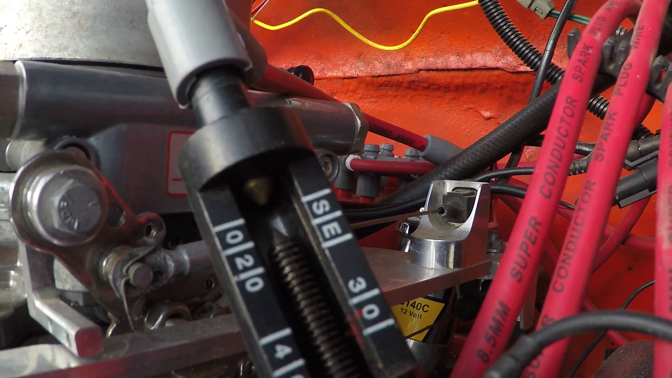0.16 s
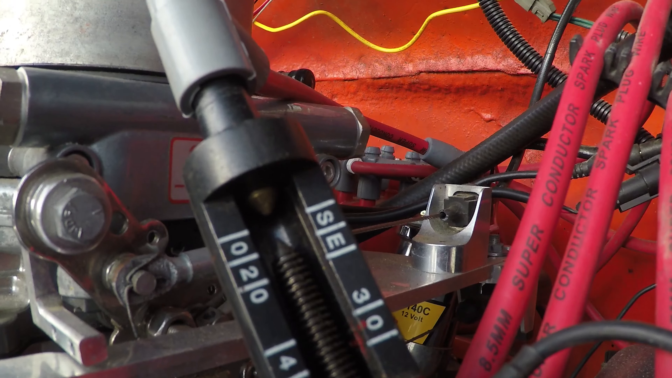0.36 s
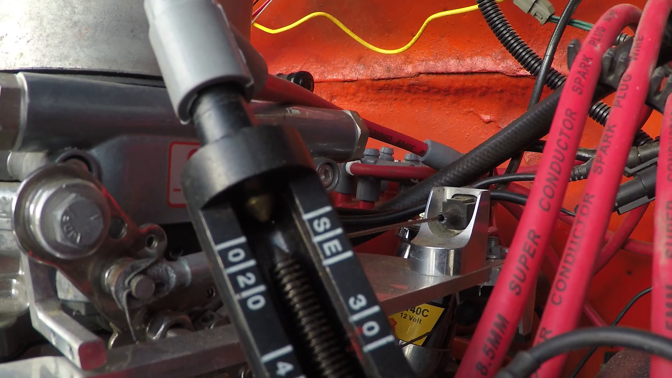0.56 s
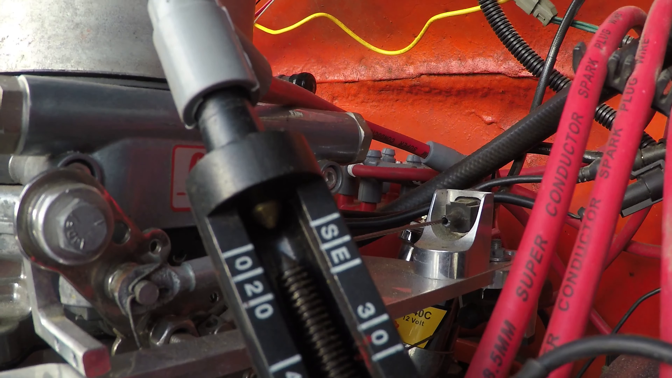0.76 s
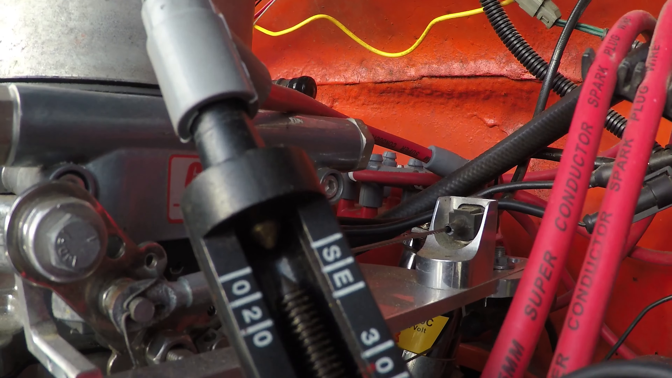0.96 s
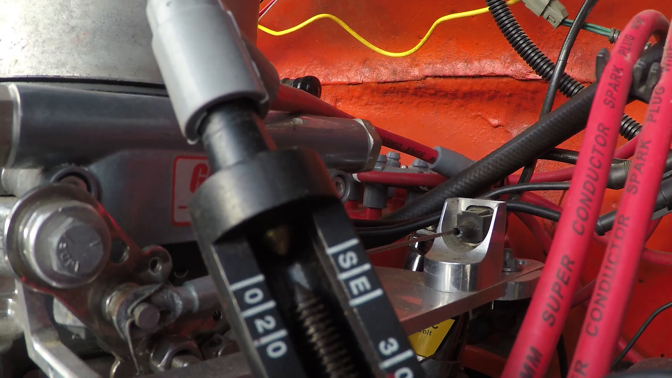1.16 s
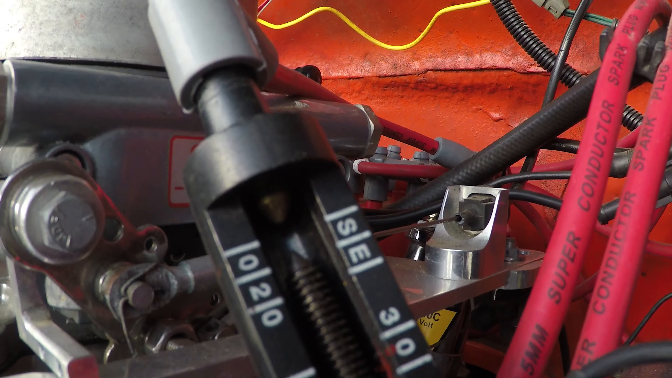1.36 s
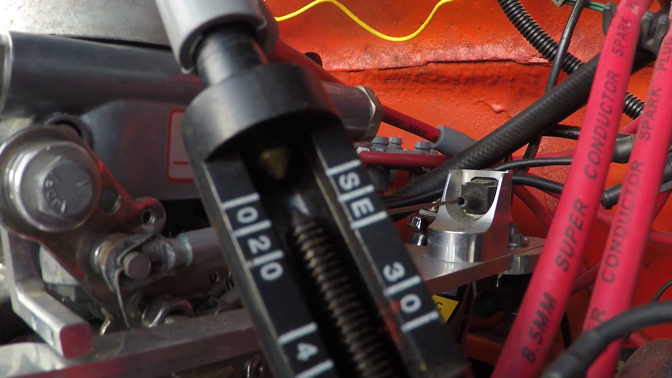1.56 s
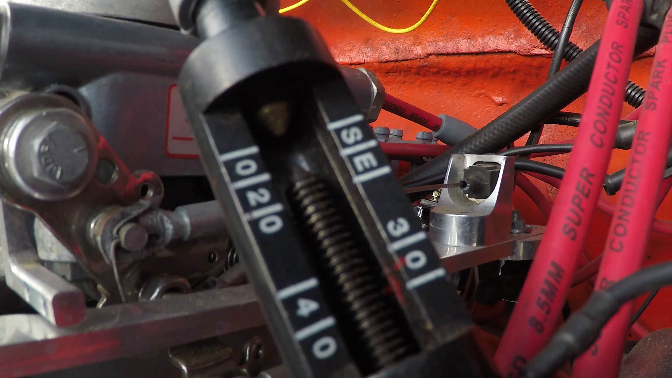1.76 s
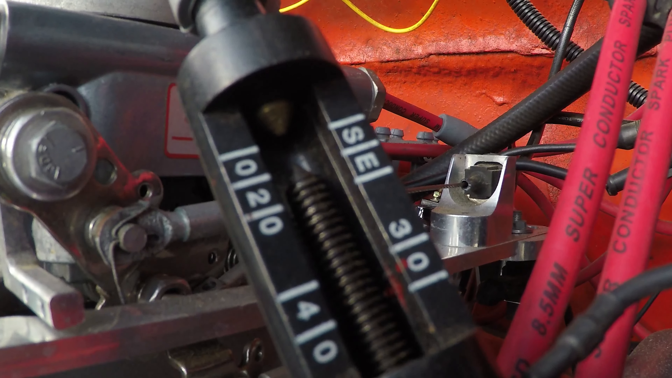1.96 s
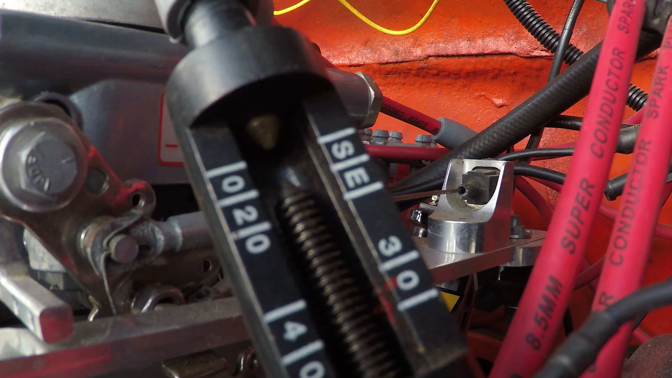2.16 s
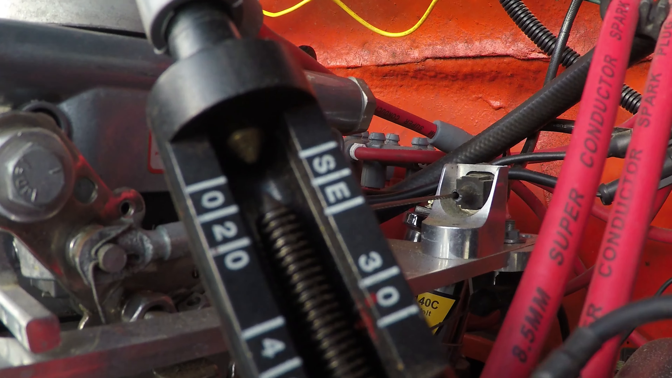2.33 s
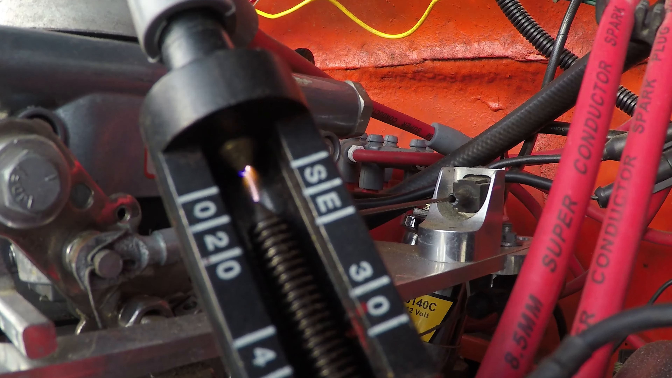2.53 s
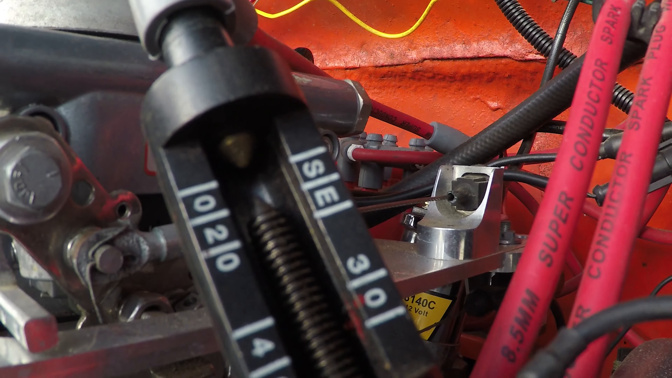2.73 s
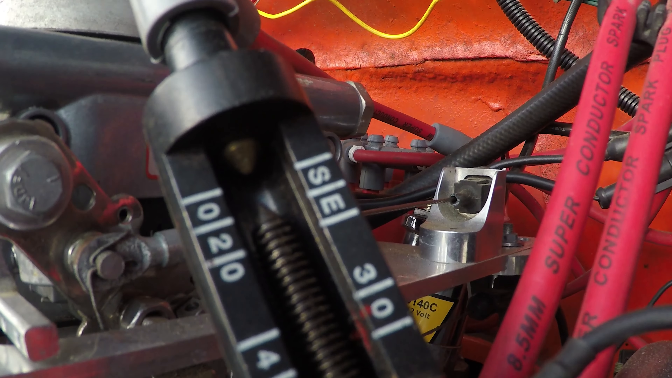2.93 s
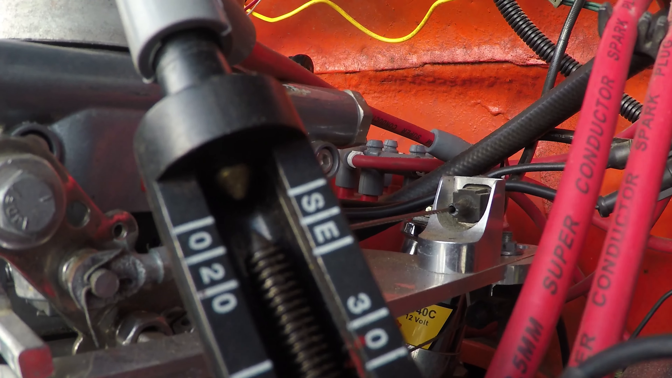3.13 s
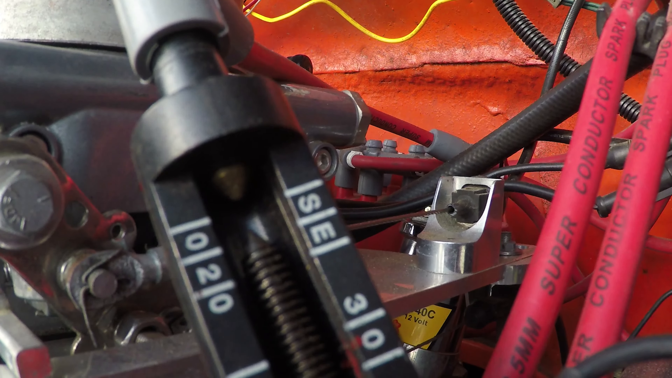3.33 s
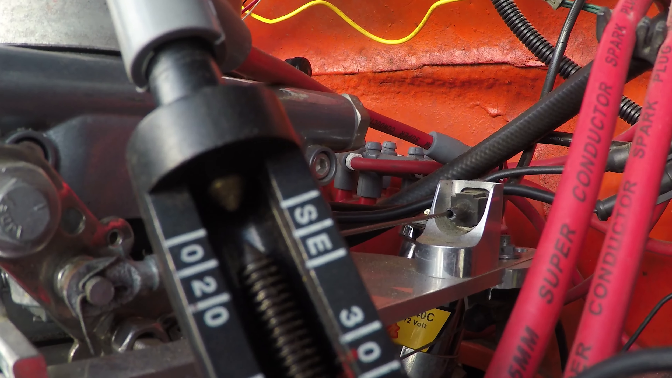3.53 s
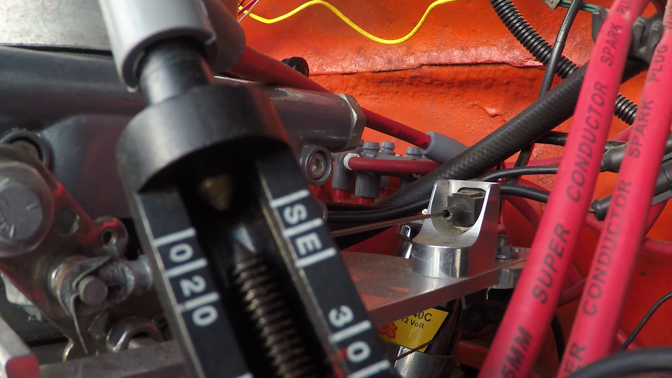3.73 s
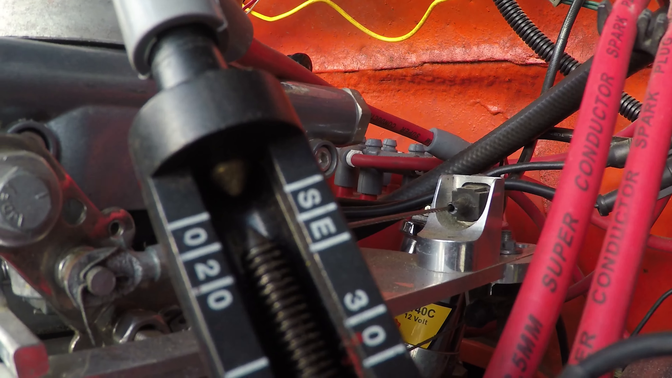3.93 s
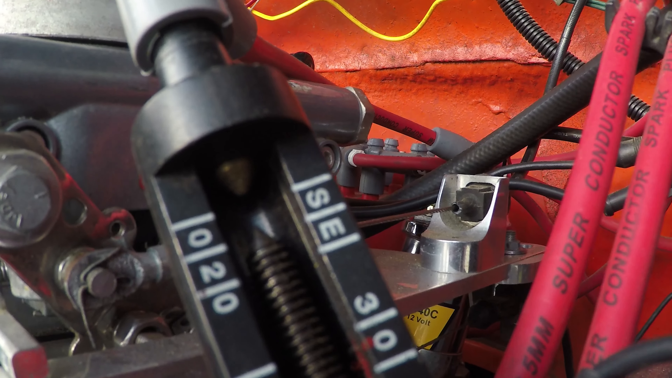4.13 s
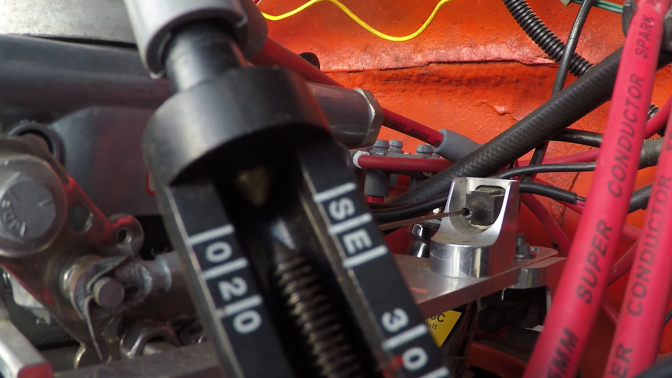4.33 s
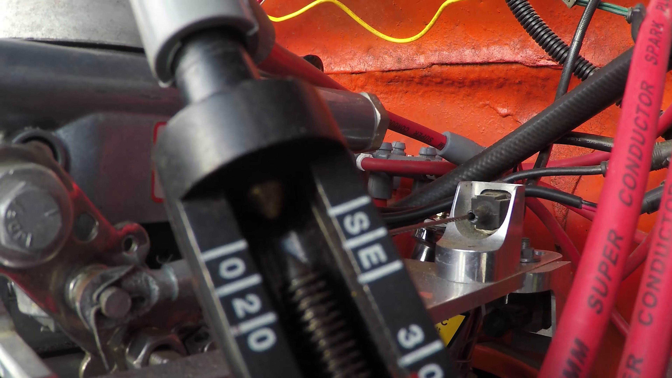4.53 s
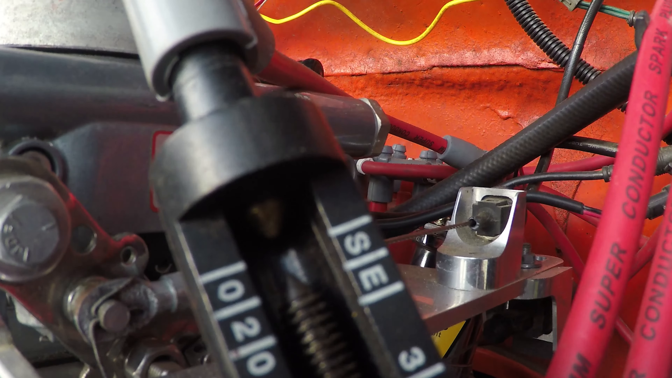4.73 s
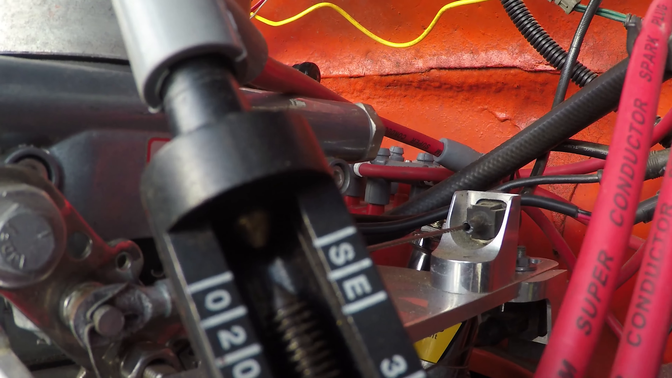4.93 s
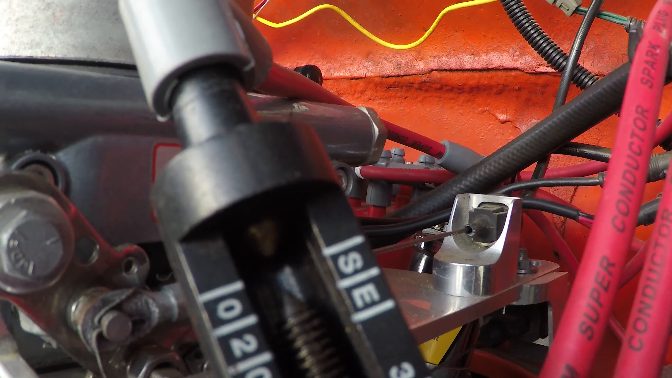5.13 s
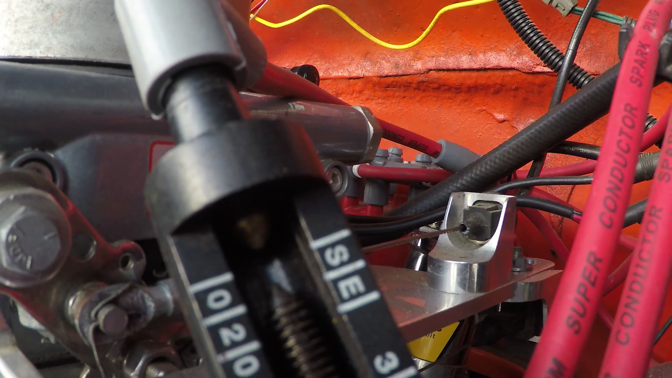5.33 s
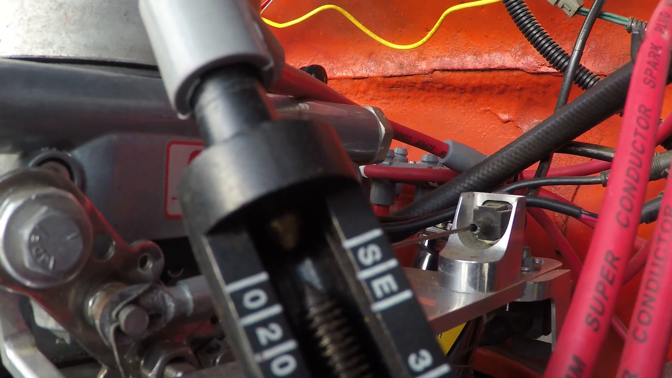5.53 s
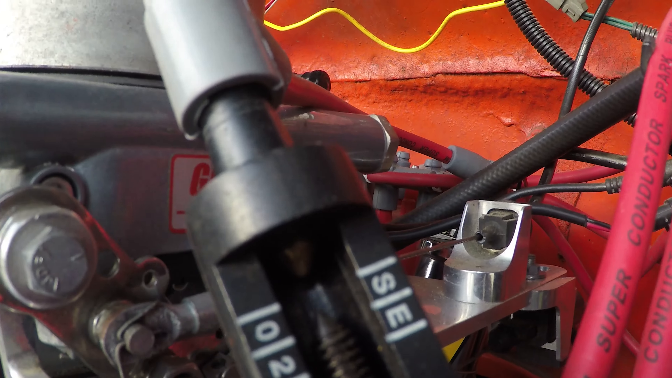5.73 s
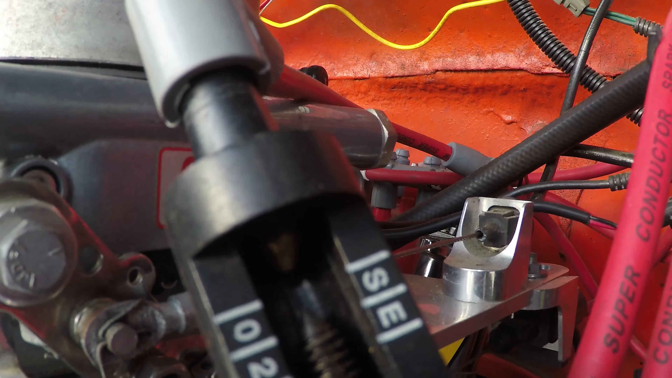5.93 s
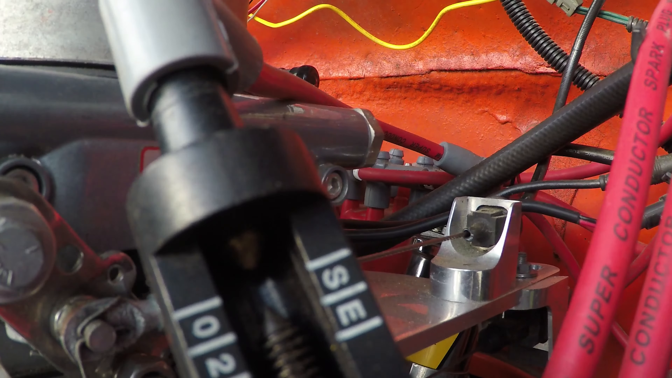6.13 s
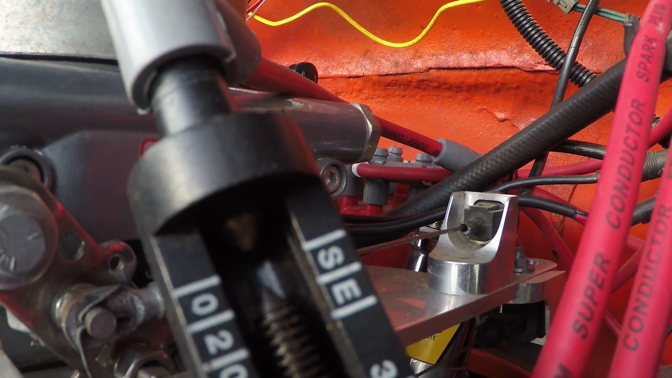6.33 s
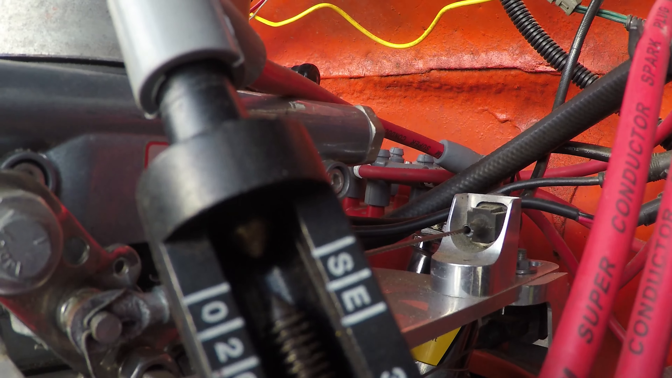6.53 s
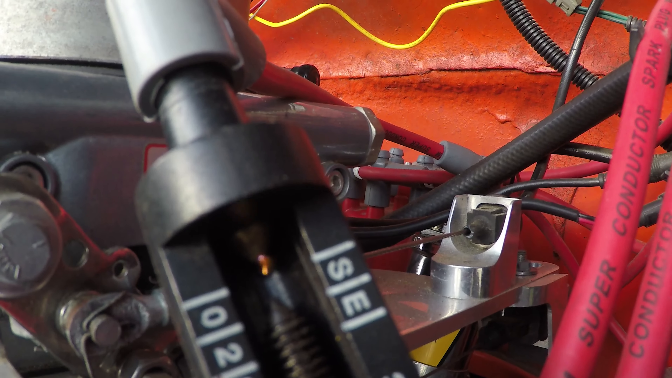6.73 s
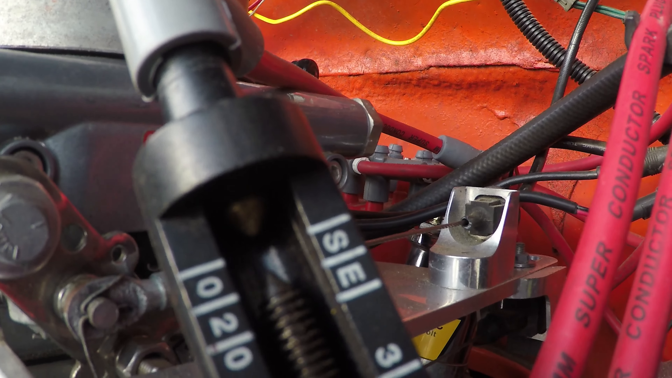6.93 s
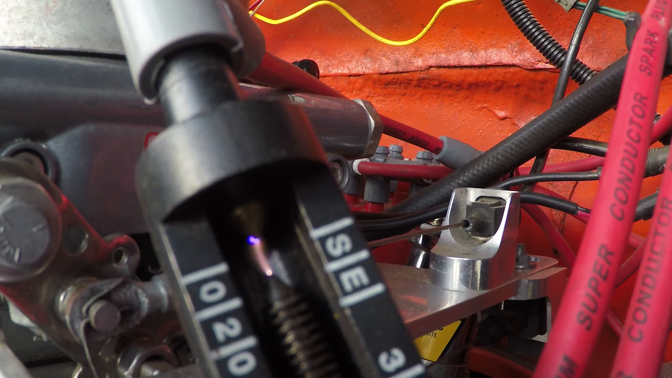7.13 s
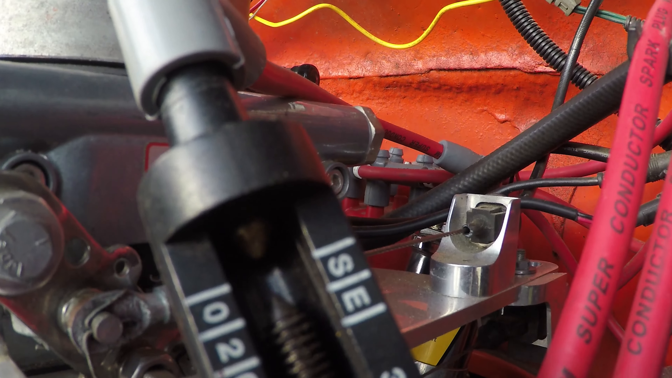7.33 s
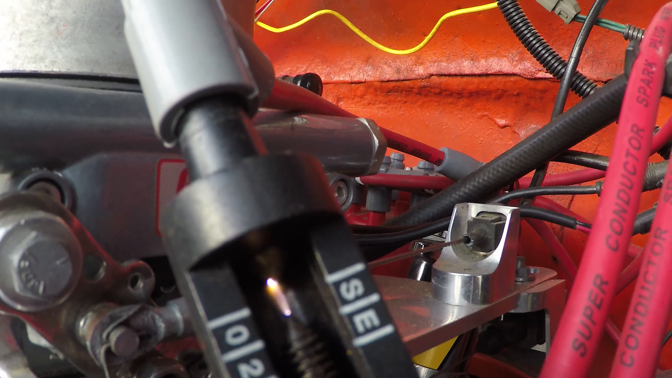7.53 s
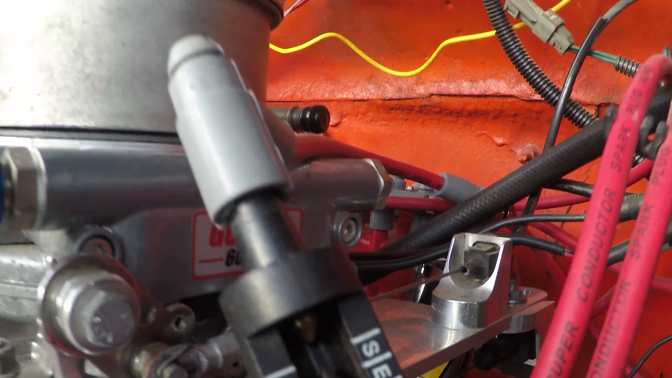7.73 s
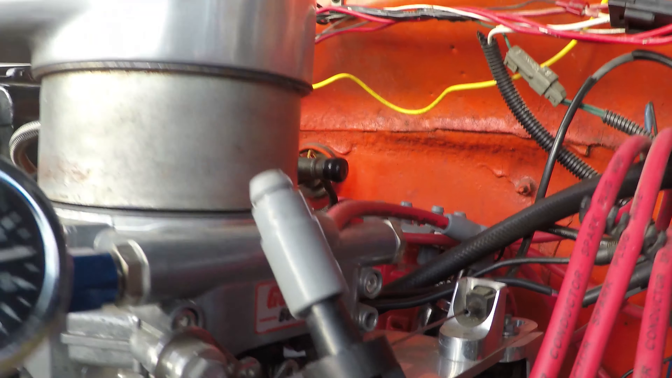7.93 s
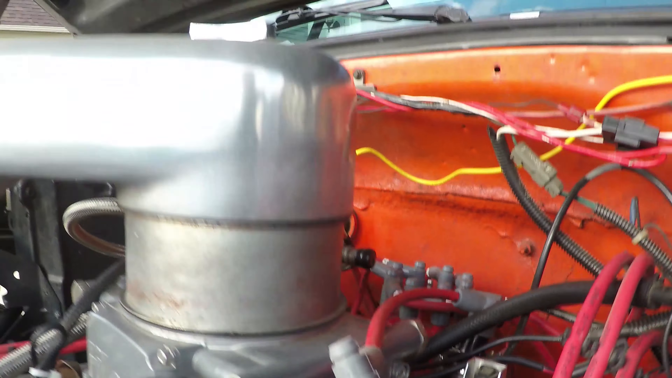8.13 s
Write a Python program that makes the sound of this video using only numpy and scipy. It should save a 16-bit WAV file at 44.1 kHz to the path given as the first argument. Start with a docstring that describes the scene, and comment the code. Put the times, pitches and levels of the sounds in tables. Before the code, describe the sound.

In an open engine bay, bright electrical zaps crack irregularly, ringing off metal, above a throbbing high whine, before a rapid volley of snaps.

```python
"""A pump whines and throbs under hiss and a low outdoor murmur, with faint ticks and one soft crackle; then sparks.
A multi-strike ignition box fires across a spark tester held close to a camera, in a parked vehicle's engine bay.
Each firing is a quick train of snaps, all one pulse shape, ringing the bay; sparse at first, then a dense run.
The pump is a jittery tone with fuzz; hiss, air, murmur and rumble are shaped noise.
The camera's gain control ducks under the sparks and creeps back within a second."""
import sys
import numpy as np
from scipy import signal
from scipy.fft import rfft, irfft, next_fast_len
from scipy.io import wavfile
from scipy.ndimage import map_coordinates

SR = 44100
rng = np.random.default_rng(int(sys.argv[2]) if len(sys.argv) > 2 else 0)


def persist_wave(psi):
    """Save psi, clipped to +-1, as 16-bit WAV."""
    counts = np.round(np.clip(psi, -1, 1) * 32767).astype(np.int16)
    wavfile.write(sys.argv[1], SR, np.atleast_2d(counts).T)


N = 365148


def amp(db):
    """Decibels to linear gain."""
    return 10 ** (np.asarray(db) / 20)


def unit(x):
    """Scale to rms 1."""
    return x / np.sqrt(np.mean(x ** 2) + 1e-20)


def along(points, hz):
    """Read (freq_hz, value) points on a log frequency axis."""
    freq_hz, value = np.transpose(points)
    return np.interp(np.log(hz + 1), np.log(freq_hz + 1), value)


def curves(rows):
    """One value per sample for each column after the time."""
    time_s, *columns = np.transpose(rows)
    return [np.interp(np.arange(N) / SR, time_s, column) for column in columns]


def wobble(rate):
    """A smooth random curve with this many knots a second."""
    knots = rng.standard_normal(int(N * rate / SR) + 4)
    return map_coordinates(knots, [np.arange(N) * rate / SR])


def filtered(x, response):
    """Shape the spectrum of x by a response of frequency."""
    n = x.shape[-1]
    padded = next_fast_len(n + SR // 4)
    spectrum = rfft(x, padded) * response(np.fft.rfftfreq(padded, 1 / SR))
    return irfft(spectrum, padded)[..., :n]


def noise(spectrum):
    """Coloured noise of rms 1."""
    return unit(filtered(rng.standard_normal(N), lambda hz: amp(along(spectrum, hz))))


def pulse(spectrum, size=4096):
    """Minimum-phase pulse: the shortest causal one with this spectrum, peak 1."""
    cepstrum = irfft(np.log(amp(along(spectrum, np.fft.rfftfreq(size, 1 / SR)))))
    # fold the cepstrum onto positive time
    cepstrum[1:size // 2] *= 2
    cepstrum[size // 2 + 1:] = 0
    wave = irfft(np.exp(rfft(cepstrum)))
    return wave / np.abs(wave).max()


def add(track, s, sound):
    """Mix a sound into the track at s seconds."""
    part = track[max(round(s * SR), 0):][:len(sound)]
    part += sound[:len(part)]


def lagged(x, seconds):
    """Follow x sluggishly, with this time constant."""
    keep = np.exp(-1 / (seconds * SR))
    return signal.lfilter([1 - keep], [1, -keep], x)


# moments when the ignition box is triggered: [start_s]
FIRING_TIMES = [0.4548, 0.4601, 0.5865, 0.865, 0.9185, 2.5621, 2.568, 2.5762, 2.5842, 2.7347, 3.1026,
                3.2154, 3.7047, 4.1432, 4.1482, 5.3571, 5.378, 6.76, 6.7855, 6.8481, 6.8951, 6.9289, 7.0105,
                7.0371, 7.0715, 7.084, 7.09, 7.1485, 7.1677, 7.204, 7.222, 7.2684, 7.3084, 7.322, 7.407,
                7.446, 7.4616, 7.4772, 7.512, 7.5376, 7.55, 7.5696, 7.617, 7.653, 7.671]
# relative colour of one strike: [freq_hz, level_db (per Hz)]
SNAP_COLOUR = [(60, -72), (150, -25), (400, -43), (750, -21), (1050, -19), (1400, -13.5), (2000, -17.5),
               (3200, -9), (4200, -3), (6000, 3), (7000, -1), (8200, -14), (10500, -18.5), (15000, -23)]


def sparks(spark_db=2.5, recharge_s=.0057, restrike_db=-3.5, scatter_db=1.75):
    """The first strike breaks cold air with charge from the pause; hot-channel restrikes are typically weaker."""
    track, snap = np.zeros(N), pulse(SNAP_COLOUR)
    for s in FIRING_TIMES:
        pause = since_firing(s)
        first = amp(spark_db) * (1 - np.exp(-pause / recharge_s))
        restrikes = amp(restrike_db + scatter_db * rng.standard_normal(size=32))
        strike = in_bay(snap, ring_db=-3, echo_db=-7.5)
        for k, moment in enumerate(train(s)):
            strength = first * (restrikes[k] if k else 1)
            add(track, moment, strength * strike)
        # a thin swell is heard leading into each firing
        swell = lead_in(pause)
        add(track, s - len(swell) / SR, first * swell)
    return track


def train(s, first_gap=.00115, last_gap=.00162, settle=2.3, pause_per_strike_s=.0055,
          rest_strikes=5, run_strikes=11, run_firings=4, run_window_s=.25):
    """Strike times of a firing: more after a longer pause, slowing down, cut off by the next firing."""
    firings = np.array(FIRING_TIMES)
    recent = np.sum((firings < s) & (firings > s - run_window_s))
    most = run_strikes if recent >= run_firings else rest_strikes
    k = np.arange(min(np.ceil(since_firing(s) / pause_per_strike_s), most))
    gaps = last_gap + (first_gap - last_gap) * np.exp(-k / settle)
    ends = s + np.cumsum(gaps)
    next_firing = firings[firings > s].min(initial=np.inf)
    return (ends - gaps)[(k == 0) | (ends < next_firing)]


def since_firing(t, opening_pause_s=.56):
    """Seconds since the last firing before each time t; some pause has already gone by at the start."""
    starts = np.sort(np.append(FIRING_TIMES, -opening_pause_s))
    return t - starts[np.searchsorted(starts, t) - 1]


# engine bay resonances: [freq_hz, width_hz (before a floor), level_db (relative, before random scatter)]
BAY_MODES = [(1298, 39, -16), (2830, 160, -50), (3245, 180, -11.5), (4105, 98, 6), (4360, 99, -32),
             (4897, 71, 0.5), (4930, 31, -2), (5430, 87, -21), (5650, 72, -6), (6290, 120, 6),
             (6340, 29, 8.5), (6810, 110, 11.5), (7340, 33, -20), (6750, 130, -29), (7440, 77, 9.5),
             (8100, 93, 1.5), (8530, 28, -5.5), (9420, 56, -4.5), (9770, 27, -9)]
# echo decay under the hood: [freq_hz, t60_s]
HOOD_DECAY = [(500, 0.075), (1500, 0.056), (3500, 0.059), (6500, 0.088), (14000, 0.081)]
# first reflections off the tester frame and the metal next to it: [delay_s, level_db]
NEAR_REFLECTIONS = [(.00033, -22), (.00098, -25.5), (.0016, -36)]


def in_bay(snap, ring_db, echo_db):
    """A snap with first reflections, decaying bay resonances and a fresh scatter of hood echoes."""
    t = np.arange(len(snap)) / SR
    ring = np.zeros(len(t))
    for (hz, width, db), own_db in zip(BAY_MODES, rng.normal(0, 2, len(BAY_MODES))):
        damping = np.pi * max(width, 45)  # hoses and wires let no mode ring long
        tone = np.sin(2 * np.pi * (hz * t + rng.random()))
        ring += amp(db + own_db) * np.exp(-damping * t) * tone
    # noise whose bands each die away at their own rate
    hz, age, bands = signal.stft(rng.standard_normal(len(t)), SR, nperseg=128)
    fade = amp(-60 * age / along(HOOD_DECAY, hz)[:, None])
    scatter = signal.istft(bands * fade, SR, nperseg=128)[1]
    echo = signal.fftconvolve(snap, scatter)[:len(t)]
    arrive = 1 - np.exp(-t / 0.00018)  # the nearest metal is a hand's width away
    direct = snap.copy()
    for delay, db in NEAR_REFLECTIONS:
        add(direct, delay, amp(db) * snap)
    body = amp(ring_db) * unit(ring * arrive) + amp(echo_db) * unit(echo * arrive)
    return direct + np.std(snap) * body


# slow sheet-metal modes: [freq_hz, width_hz, level_db (relative to each other)]
PANEL_MODES = [(810, 1.9, -5.5), (926, 8.8, 5.5), (1285, 4.8, -0.5), (1580, 12, -1), (1900, 2.7, 4)]


def panels(x, ring_db=-2):
    """Sheet metal hums on faintly after the snaps: narrow resonances in parallel."""
    def ring(f):
        return sum(amp(db) * 1j * f * width / (hz ** 2 - f ** 2 + 1j * f * width)
                   for hz, width, db in PANEL_MODES)
    return x + amp(ring_db) * filtered(x, ring)


# relative colour of the thin swell heard before a firing: [freq_hz, level_db (per Hz)]
LEAD_IN_COLOUR = [(1200, -25), (2900, -15.5), (3400, -11), (4200, -10.5), (4900, 0), (5200, 5.5),
                  (5600, -16), (6500, -7), (7100, 5.5), (7600, 1), (8700, -9.5), (9400, -7), (11000, -13.5),
                  (15000, -39)]


def lead_in(pause, level_db=-28.5, extra_db=9.5, build_s=.15, t60=0.063, uneven_db=4, size=2048):
    """A thin, whistly noise swell, rising exponentially, stronger after a longer pause, new in colour each time."""
    knots = np.linspace(0, SR / 2, num=80)
    colour = uneven_db * rng.standard_normal(len(knots))
    thin = filtered(rng.standard_normal(size),
                    lambda hz: amp(along(LEAD_IN_COLOUR, hz) + np.interp(hz, knots, colour)))
    to_go = np.arange(size)[::-1] / SR
    gain = amp(level_db + extra_db * (1 - np.exp(-pause / build_s)))
    return gain * unit(thin) * amp(-60 * to_go / t60)


# faint ticks and one soft crackle: [start_s, level_db (before the shared trim)]
TICK_EVENTS = [(0.1283, -35), (0.2344, -32), (0.5238, -13), (1.2231, -32), (1.25, -30), (2.14, -22.5),
               (2.1644, -39), (6.304, -36), (6.324, -39), (6.4934, -36.5)]


def ticks(tick_db=-4):
    """Faint ticks and one soft crackle: short pulses heard mostly through the bay's echo."""
    track, snap = np.zeros(N), pulse([(800, -23), (3000, -7), (5500, 13.0), (8500, -8.5), (15000, -10)])
    for s, db in TICK_EVENTS:
        add(track, s, amp(db + tick_db) * in_bay(snap, ring_db=-12, echo_db=13.5))
    return track


# relative colour of the fuzz around the pump tone: [freq_hz, level_db (per Hz)]
WHINE_COLOUR = [(3500, -62), (3950, 0), (4130, -17), (4230, 13), (4300, -25), (4360, 14), (4480, -29),
                (4900, -18)]


def pump(level_db, whine_hz=4235, swing_hz=30, jitter_hz=45, throb_hz=24.13, depth=0.46, fuzz_db=-2):
    """A jittery tone and its fuzz; once per turn of the pump it swells and lifts in pitch."""
    turn_hz = throb_hz * (1 + 0.0098 * wobble(2.23))
    throb = np.sin(2 * np.pi * np.cumsum(turn_hz) / SR)
    pitch_hz = whine_hz + swing_hz * throb + jitter_hz * wobble(300)
    tone = unit(np.sin(2 * np.pi * np.cumsum(pitch_hz) / SR))
    whine = tone + amp(fuzz_db) * noise(WHINE_COLOUR)
    return amp(level_db) * unit(whine * (1 + depth * throb))


# relative colour of the hiss with its edge open: [freq_hz, level_db (per Hz)]
HISS_COLOUR = [(2500, -38), (3600, -12), (4100, 4), (4400, 1), (4750, 2.5), (5300, 1.5), (6000, 4),
               (6700, 5), (7500, -14), (9000, -55)]


def hiss(level_db, steepness=28, open_hz=7500, sunk_hz=5540, hold_s=.65, fall_s=.13):
    """Noise under a moving low-pass edge that opens after sparks and sinks halfway after hold_s."""
    hz, t, bands = signal.stft(noise(HISS_COLOUR), SR, nperseg=512)
    sunk = 1 / (1 + np.exp((hold_s - since_firing(t)) / fall_s))
    edge_hz = open_hz + (sunk_hz - open_hz) * sunk
    lowpass = 1 / np.sqrt(1 + (hz[:, None] / edge_hz) ** (2 * steepness))
    return amp(level_db) * signal.istft(bands * lowpass, SR, nperseg=512)[1][:N]


# relative colour of the air: [freq_hz, level_db (per Hz)]
AIR_COLOUR = [(300, -22), (650, -9.5), (860, 6.5), (1060, -2), (1300, 3), (1650, -1), (2300, -4.5),
              (3300, -7), (4500, -15.5), (6500, -1), (7500, -7.5), (9000, -6), (12700, -14), (15000, -29)]


def air(level_db):
    """Broad shaped noise whose level flutters gently."""
    flutter_db = .7 * wobble(8)
    return amp(level_db + flutter_db) * noise(AIR_COLOUR)


def hush(dip_db=-6, recovery=0.062):
    """Gain curve: the treble background dips briefly after each firing."""
    pause = since_firing(np.arange(N) / SR)
    return amp(dip_db * np.exp(-(pause / recovery) ** 2))


# faint answer of the buildings around the vehicle: [freq_hz, level_db (relative)]
YARD_COLOUR = [(500, -16), (720, -5.5), (860, 13.5), (1020, -4), (1300, -5), (1650, -2.5), (2500, -13),
               (4000, -26), (8000, -35)]


def yard(x, wet_db=-13, t60=1.0, delay=.02):
    """A dull, diffuse noise tail that follows the snaps back from the buildings."""
    t = np.arange(SR) / SR
    tail = rng.standard_normal(len(t)) * amp(-60 * t / t60) * (1 - np.exp(-(t / delay) ** 2))
    tail = filtered(tail / np.linalg.norm(tail), lambda hz: amp(along(YARD_COLOUR, hz)))
    return amp(wet_db) * signal.fftconvolve(x, tail)[:N]


# relative colour of the outdoor murmur: [freq_hz, level_db (per Hz)]
MURMUR_COLOUR = [(20, -30), (90, -38), (125, -18), (150, -1.5), (172, -4), (190, 3), (215, -1.5),
                 (320, -8.5), (480, -14.5), (700, -12), (1500, -81)]
# its level before a random wander: [time_s, level_db]
MURMUR_FADER = [(0, -55.5), (1.4, -54.5), (2.5, -55), (3.1, -59), (4.4, -53.5), (6.4, -54.5), (7.1, -54),
                (7.75, -59), (8.28, -59)]


def murmur():
    """Low shaped noise from outdoors, wandering in level."""
    level_db = curves(MURMUR_FADER)[0] + 1.75 * wobble(6)
    return amp(level_db) * noise(MURMUR_COLOUR)


# rumble of the moving camera: [time_s, level_db]
HANDLING_FADER = [(0, -47), (1.1, -62), (2.2, -68), (2.8, -78), (5.9, -76), (6.15, -59), (7.4, -69),
                  (8.28, -47)]


def rumble():
    """Handling of the camera: deep shaped noise that rises and falls."""
    deep = noise([(20, -7), (45, 3), (80, -1), (130, -15), (400, -72)])
    return amp(curves(HANDLING_FADER)[0]) * deep


def ears(centre, split_hz=11300, left_db=-3, right_db=1, lag=.000017, leak=0.0053, apart_db=-7, top_hiss_db=-69):
    """Both ears hear nearly the same, except in the top treble, which leans right, blurs and has its own hiss."""
    def apart(hz):
        return leak + (1 - leak) / (1 + (split_hz / (hz + 1)) ** 30)

    def port(db, delay):
        return filtered(centre, lambda hz: amp(db * apart(hz)) * np.exp(-2j * np.pi * hz * delay * apart(hz)))

    scatter = rng.standard_normal(size=256)  # a few milliseconds of short paths that differ between the ears
    blur = filtered(signal.fftconvolve(centre, scatter / np.linalg.norm(scatter))[:N], apart)
    top_hiss = noise([(9000, -40), (11000, -33), (12500, -6), (15000, 14)])
    side = amp(apart_db) * blur + amp(top_hiss_db) * top_hiss
    return np.array([port(left_db, lag / 2) + side, port(right_db, -lag / 2) - side])


# slow drift of the steady sounds: [time_s, pump_level_db, hiss_level_db, air_level_db]
STEADY_DRIFT = [(0.15, -55, -42, -49), (0.7, -46, -44, -50.5), (2.1, -49, -45, -49.5),
                (2.5, -58.5, -53.5, -54.5), (3.2, -46.5, -46, -53), (4.4, -45.5, -44, -50),
                (5.2, -49, -45.5, -51), (5.7, -44.5, -42.5, -49), (6.5, -49.5, -48, -50.5),
                (7.85, -51, -48.5, -50), (8.28, -52, -45, -51.5)]


def scene():
    """Sparks and ticks in front of the pump and the steady backgrounds."""
    pump_db, hiss_db, air_db = curves(STEADY_DRIFT)
    snaps = sparks()
    treble = hush() * (pump(pump_db) + hiss(hiss_db) + air(air_db))
    return ears(panels(snaps) + yard(snaps) + ticks() + treble + murmur() + rumble())


def gain_control(x, threshold_db=-35, slope=.31, attack_s=.01, memory_s=.27):
    """The gain falls as recent energy passes a soft threshold, and returns as that energy is forgotten."""
    power = lagged(np.mean(x ** 2, axis=0), memory_s)
    over_db = 10 * np.log10(1 + power / amp(threshold_db) ** 2)
    return x * amp(-slope * lagged(over_db, attack_s))  # slope: dB of cut per dB over


def record(dry, notch_hz=575, notch_width_hz=60, notch_db=-15, bass_hz=115, bass_db=-18, top_hz=15500):
    """The camera rides its gain, clips at full scale, cuts bass, notches the low middle and limits the band."""
    def tone_db(hz):
        notch = notch_db * np.exp(-((hz - notch_hz) / notch_width_hz) ** 2)
        shelf = bass_db / (1 + (hz / bass_hz) ** 10)
        return notch + shelf

    clipped = np.clip(gain_control(dry), -1, 1)
    coloured = filtered(clipped, lambda hz: amp(tone_db(hz)))
    return filtered(coloured, lambda hz: hz < top_hz)


dry = scene()
out = record(dry)
persist_wave(out)
```